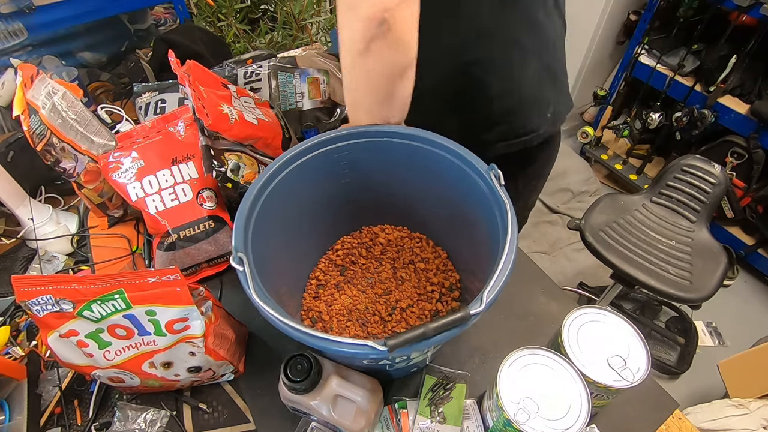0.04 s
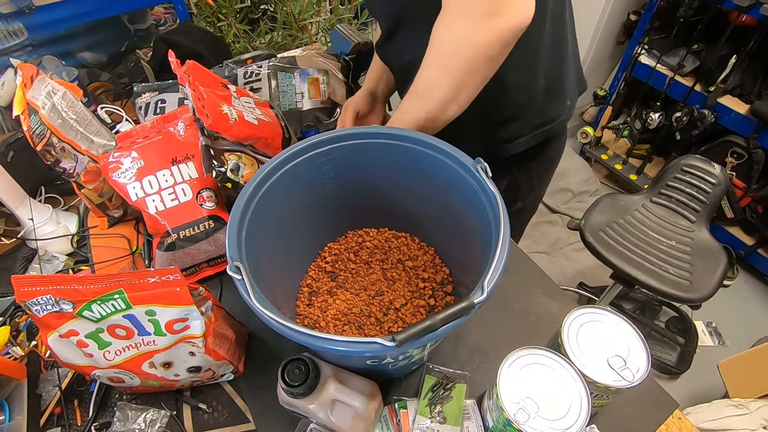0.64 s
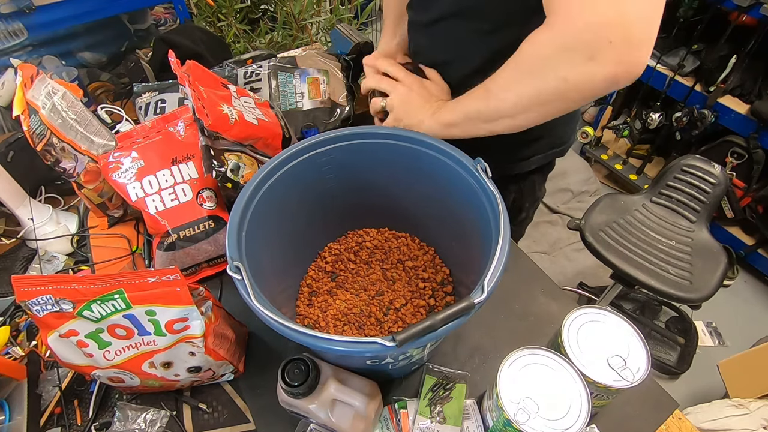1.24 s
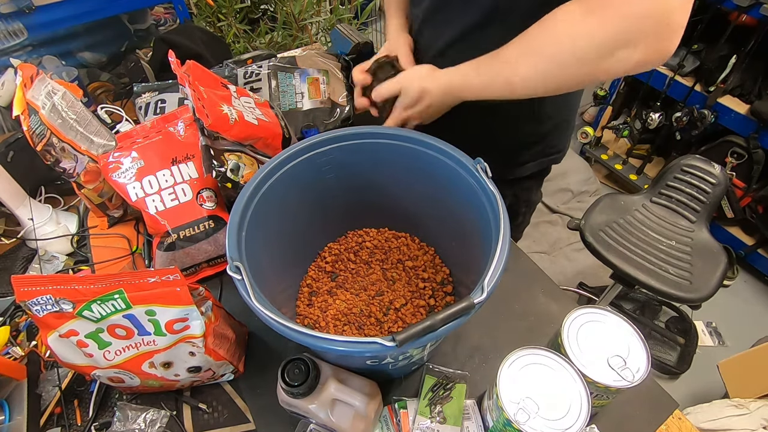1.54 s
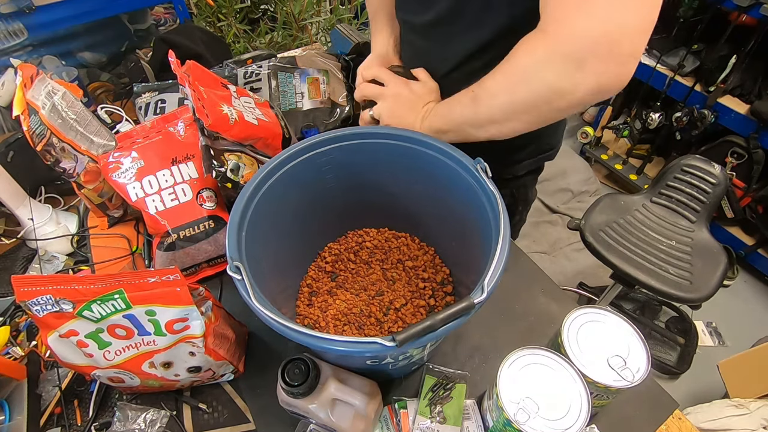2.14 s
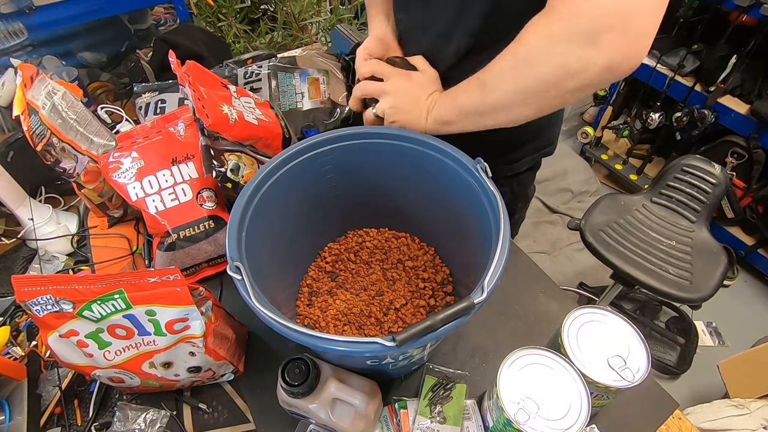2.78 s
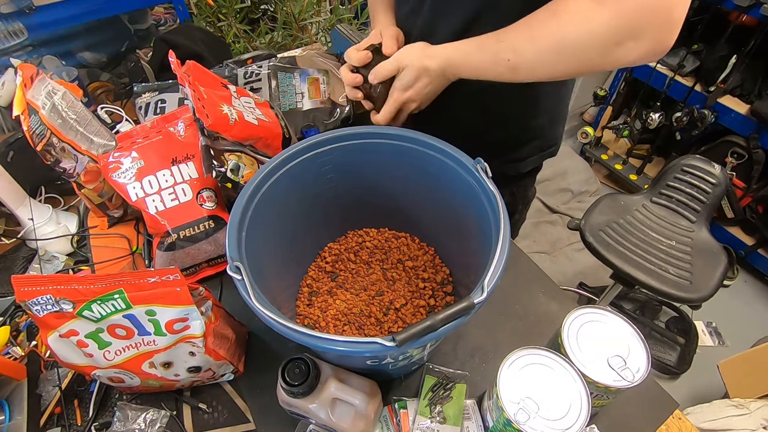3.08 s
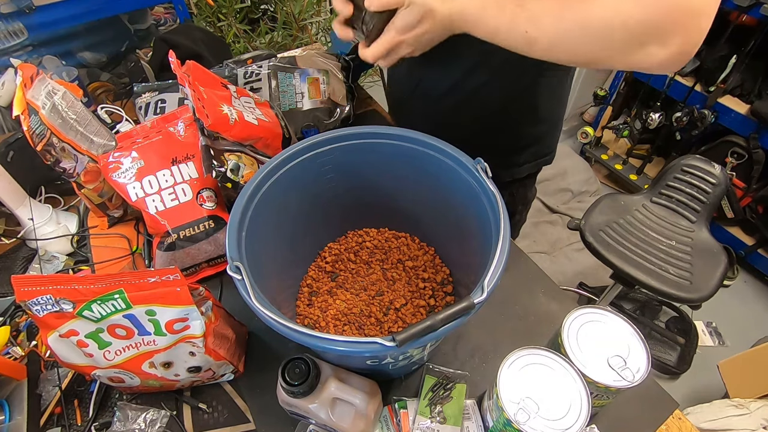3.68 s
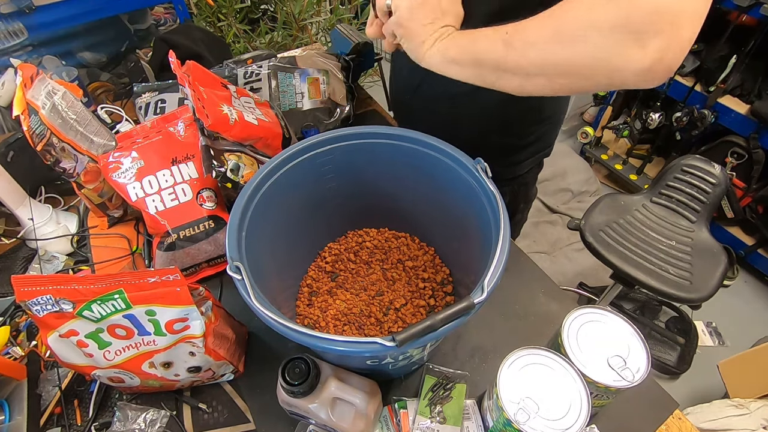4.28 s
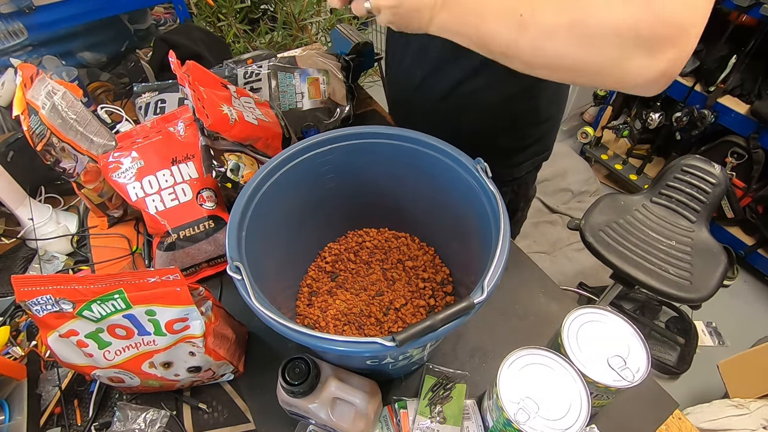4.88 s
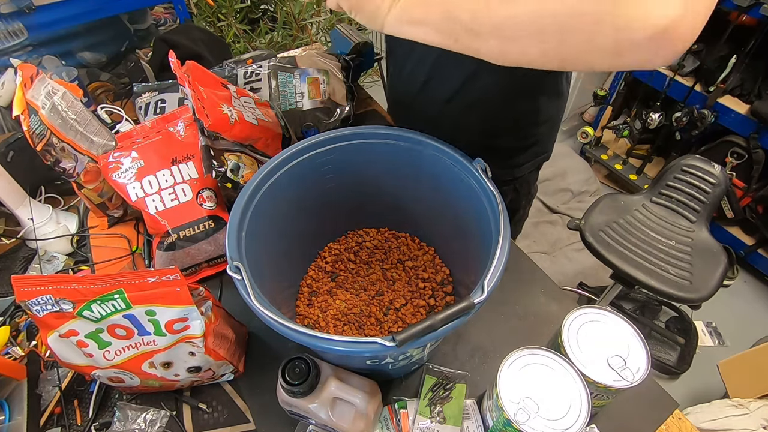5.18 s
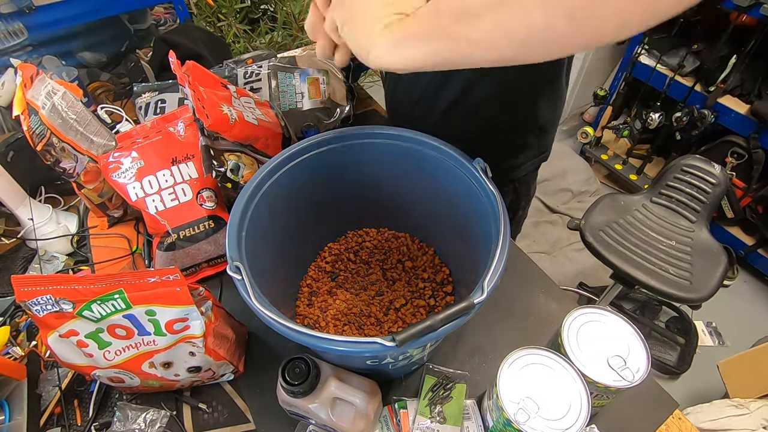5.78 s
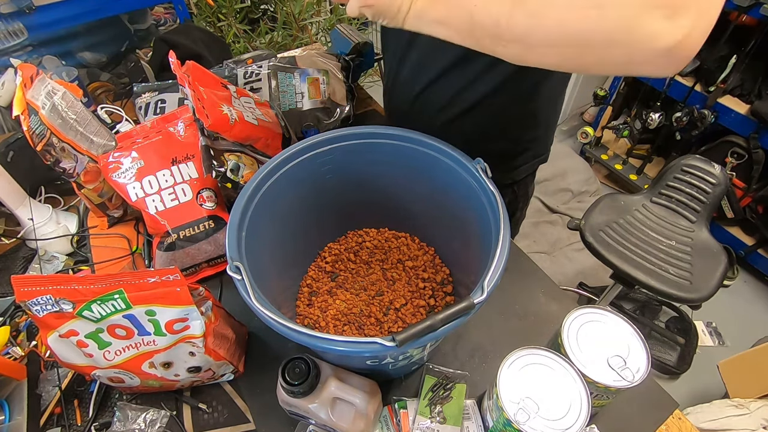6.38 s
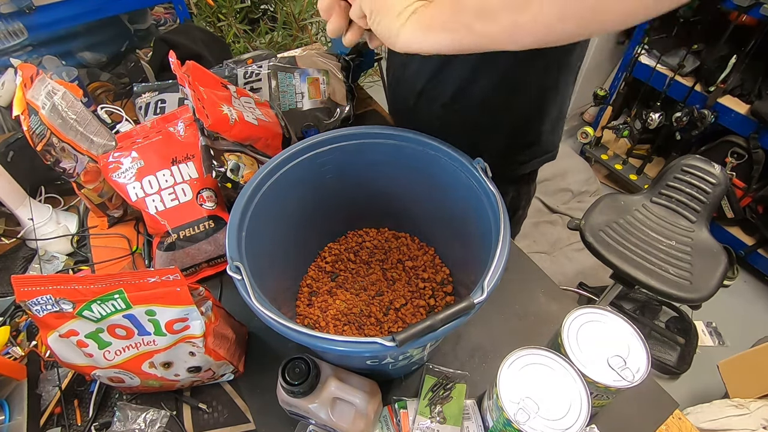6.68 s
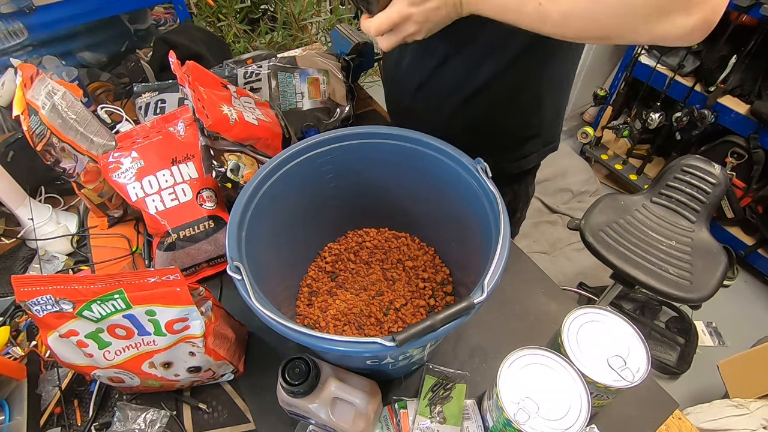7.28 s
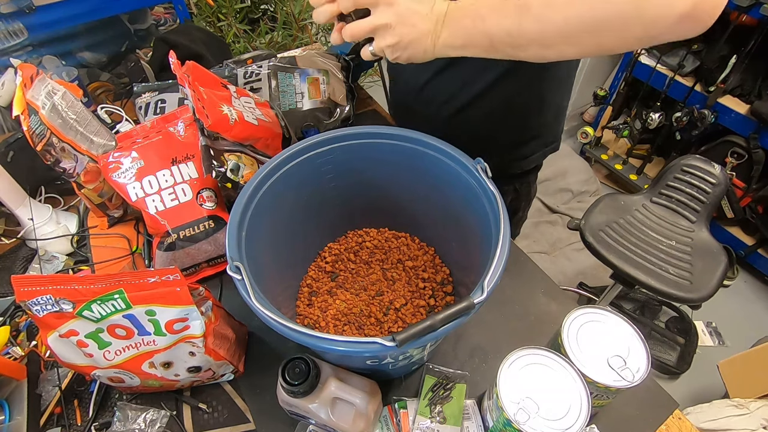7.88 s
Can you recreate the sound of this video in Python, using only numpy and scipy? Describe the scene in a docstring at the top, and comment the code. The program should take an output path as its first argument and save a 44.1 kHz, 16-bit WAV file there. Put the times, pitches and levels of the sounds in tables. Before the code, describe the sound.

A plastic hand grinder is picked up from a bench with a knock and a soft slide. After about a second it starts crushing dry pellets, twist after twist: sharp, brittle snaps come in irregular clusters over gritty grinding, with a few hollow knocks and brief plastic creaks. The crunching continues to the end. It sounds close, in a small quiet shed, with a bucket ringing faintly along.

```python
"""In a cluttered shed, dry bait pellets are crushed in a hand-twisted plastic grinder above a bucket.
The grinder is picked up from the bench and closed; at each twist the pressure builds, crumbs grind
and pellets snap between its teeth. Each brittle fracture is a burst of impulses that excites the wall
and the air of the hollow pot and jolts the hands. Now and then the halves creak or lurch.
The open plastic bucket resonates and the small room reverberates, over quiet air and a faint hum."""
import sys
import numpy as np
from scipy import signal
from scipy.fft import rfft, irfft, next_fast_len
from scipy.io import wavfile

SR = 44100
rng = np.random.default_rng(int(sys.argv[2]) if len(sys.argv) > 2 else 0)


def write(x):
    x = np.atleast_2d(x).T
    wavfile.write(sys.argv[1], SR, np.round(np.clip(x, -1, 1) * 32767).astype(np.int16))


N = 358974
SIZE = 8192  # samples in a force burst or a filter design

# spectrum of a snap heard through the plastic wall: f/Hz, level/dB
WALL_SPECTRUM = [(200, -28.5), (330, -3.5), (850, -11.5), (1230, -5.5), (1580, -7), (2130, 2.5),
                 (2620, -2.5), (3350, 1), (4500, -5.5), (5500, -6), (6400, -12), (7500, -11), (9200, -15.5),
                 (10800, -30.5), (15500, -41.5)]
# spectrum of a dull jolt of the whole grinder: f/Hz, level/dB
JOLT_SPECTRUM = [(22, -39.5), (60, -8.5), (115, -15), (155, 8), (230, 1.5), (340, 4.5), (600, -20)]
# how the hands hold the pot: t/s, cavity pitch f/Hz, cavity level/dB and jolt level/dB re the snap
GRIP = [(1.1, 580, -17, -24), (1.4, 477, -10.5, -24), (3, 442, -14.5, -20), (3.7, 548, -13, -23),
        (5, 527, -11, -25.5), (5.7, 479, -10, -24), (6.5, 467, -13, -26), (7.05, 500.6, -13.5, -24.5),
        (7.8, 462.6, -14, -26.5)]
# twists of the hands: start t/s, length/s, level/dB at full pressure
TWISTS = [(1.268, 0.36, -27), (1.728, 0.065, -35.5), (1.894, 0.11, -32.5), (2.055, 0.082, -26),
          (2.248, 0.21, -25), (2.553, 0.099, -24.5), (2.894, 0.16, -30.5), (3.109, 0.22, -34),
          (3.42, 0.21, -26), (3.704, 0.069, -33), (4.0, 0.22, -39.5), (4.39, 0.19, -25.5),
          (4.677, 0.033, -27), (4.808, 0.052, -25.5), (4.935, 0.046, -39), (5.167, 0.222, -33),
          (5.5, 0.287, -31), (5.851, 0.3, -33.5), (6.21, 0.32, -32), (6.663, 0.031, -38.5),
          (6.853, 0.1, -35), (7.306, 0.13, -33), (7.49, 0.34, -34.5)]


def pellet_breaks(piece_hz=(900, 10000), rim_hz=1220, scatter=0.33, count=5):
    """Brittle fracture: the pieces snap through the wall, excite the pot's air and jolt the grinder."""
    # loudest breaks and knocks of plastic: t/s, crumbling time/s, level/dB, tilt/(dB per octave)
    loud_breaks = [(0.243, 0.0045, -20, -1.5), (0.388, 0.0065, -38.5, -6), (0.539, 0.0052, -36.5, 5),
                   (0.834, 0.001, -44, -7), (0.932, 0.0021, -42, 3.5), (1.106, 0.0031, -25.5, -2.5),
                   (1.205, 0.0016, -34, -1.5), (1.254, 0.0019, -32, 0.5), (1.289, 0.0043, -21, -1.5),
                   (1.322, 0.0016, -27, -0.5), (1.393, 0.004, -27, -7.5), (1.444, 0.0044, -19.5, -1.5),
                   (1.535, 0.0093, -14.5, -3.5), (1.585, 0.0075, -18.5, -2.5), (1.682, 0.0021, -28, -3),
                   (1.745, 0.01, -25.5, -8.5), (1.898, 0.0078, -18, 3), (1.923, 0.0044, -19, -4),
                   (2.057, 0.00061, -23.5, -1), (2.072, 0.0051, -18, -0.5), (2.115, 0.0057, -19, 2.5),
                   (2.296, 0.0021, -22, -1), (2.344, 0.0039, -17.5, 3), (2.473, 0.0003, -24, -1),
                   (2.561, 0.011, -18, 0.5), (2.682, 0.0092, -15, 1), (2.717, 0.0012, -23, 1),
                   (2.867, 0.0026, -27, -0.5), (2.897, 0.014, -18, -1), (2.941, 0.0053, -16.5, -4),
                   (2.975, 0.0056, -20.5, 1), (3.01, 0.0034, -23, 2.5), (3.129, 0.012, -19, -2),
                   (3.168, 0.0043, -23, 3.5), (3.189, 0.0031, -19, 0.5), (3.227, 0.0049, -21, 3),
                   (3.291, 0.0012, -25.5, -2), (3.323, 0.0055, -20, -0.5), (3.447, 0.006, -26, -2),
                   (3.541, 0.0031, -20, -0.5), (3.72, 0.0039, -23, -1.5), (3.829, 0.0032, -32.5, -5),
                   (3.99, 0.0092, -27, -3.5), (4.055, 0.0012, -19.5, 5.5), (4.161, 0.0036, -22.5, 4.5),
                   (4.254, 0.0013, -31, 0), (4.389, 0.00057, -23, -2.5), (4.414, 0.00068, -40, -3.5),
                   (4.475, 0.0017, -20.5, 7.5), (4.493, 0.012, -19.5, 6), (4.548, 0.0096, -18, 6.5),
                   (4.689, 0.0055, -15.5, 0.5), (4.8, 0.0013, -23.5, 3.5), (4.842, 0.0021, -25, 6.5),
                   (4.936, 0.0067, -24, 0.5), (4.964, 0.0059, -16, 1), (5.115, 0.0012, -35.5, -4.5),
                   (5.193, 0.0099, -24.5, -2), (5.225, 0.0077, -18.5, 2), (5.251, 0.0057, -18, -1.5),
                   (5.321, 0.00019, -29, 15), (5.34, 0.0021, -20, 3.5), (5.55, 0.006, -19.5, -1.5),
                   (5.572, 0.0023, -19.5, 2.5), (5.618, 0.011, -16.5, 0), (5.67, 0.003, -22, 1),
                   (5.707, 0.0077, -19.5, 0), (5.741, 0.0074, -24.5, 7), (5.873, 0.0052, -28, -2.5),
                   (5.906, 0.0027, -20, 0), (5.932, 0.01, -15, -0.5), (6.017, 0.0057, -15.5, 1.5),
                   (6.159, 0.002, -28.5, -5.5), (6.243, 0.0018, -23.5, 6), (6.301, 0.0069, -16, 1),
                   (6.353, 0.0021, -22.5, 1.5), (6.442, 0.00095, -23, 1.5), (6.463, 0.011, -17, 0.5),
                   (6.546, 0.0024, -20, 0.5), (6.678, 0.003, -20, 0), (6.764, 0.0019, -21.5, -2),
                   (6.856, 0.00067, -19, 2.5), (6.86, 0.012, -18.5, 3.5), (7.015, 0.0062, -21, -1),
                   (7.055, 0.0029, -16.5, 1.5), (7.319, 0.00049, -20.5, 4), (7.32, 0.0077, -18, 0),
                   (7.377, 0.002, -22, 1.5), (7.433, 0.0017, -22.5, -6.5), (7.566, 0.0033, -19.5, -1),
                   (7.617, 0.0049, -16.5, 2), (7.684, 0.0053, -19.5, -3), (7.771, 0.0022, -21.5, 5.5),
                   (7.784, 0.0024, -20.5, 3)]
    # the rim's open clack, which fades as the halves close up: t/s, level/dB at its resonance
    rim_clack = [(3.1, 3.5), (5.2, -3)]
    out, jolt = np.zeros(N), response(JOLT_SPECTRUM)
    grip_s, grip_hz, grip_cavity_db, grip_jolt_db = np.transpose(GRIP)
    for start, crumble_s, db, tilt_db in loud_breaks + small_breaks():
        pitches = np.geomspace(*piece_hz, count) * np.exp(scatter * rng.uniform(-1.22, 1, count))
        # small, high pieces are more numerous than large ones
        pieces = [unit(force_burst(crumble_s, np.sqrt(hz / piece_hz[0]))) for hz in pitches]
        force = sum(pieces)
        snap = sum(through(piece, chip_ring(hz)) for piece, hz in zip(pieces, pitches))
        rim_gain = undb(np.interp(start, *np.transpose(rim_clack)))
        snap += (rim_gain - 1) * resonance(snap, rim_hz, q=3.3)
        cavity = pot_air(np.interp(start, grip_s, grip_hz))
        # weaker breaks sound hollower
        cavity_db = np.interp(start, grip_s, grip_cavity_db) + 0.18 * (-13.5 - db)
        sound = unit(through(snap, response(WALL_SPECTRUM, tilt_db)))
        sound += undb(cavity_db) * unit(through(force, cavity))
        sound += undb(np.interp(start, grip_s, grip_jolt_db)) * unit(through(force, jolt))
        add(out, start, undb(db) * sound)
    return out


def small_breaks(crumble_s=0.0013, above_db=2, spread_db=3, tilt_db=-1, count=60):
    """Fracture under load: rows of lesser breaks at random times, as strong as the hands press."""
    timing, strength, sizes = rng.random((count, 3)).T
    starts = (np.arange(count) + timing) / count * (N - 1)
    load_db = 20 * np.log10(pressure(TWISTS)[starts.astype(int)] + 1e-9)
    levels = load_db + above_db + spread_db * (2 * strength - 1)
    return [(start / SR, crumble_s * (.5 + size), db, tilt_db)
            for start, size, db in zip(starts, sizes, levels) if db > -50]


def force_burst(scale_s, density=1, rate=1200, spread_db=1.0, limit=64):
    """Impulsive excitation: a run of tiny, uneven impulses that swells and thins out."""
    delay_s = rng.gamma(2, 1, limit) * scale_s
    force = rng.choice([-1, 1], limit) * undb(spread_db * np.minimum(rng.exponential(1, limit), 4))
    active = np.arange(limit) < density * (3 + rate * scale_s)
    return np.bincount(np.minimum(delay_s * SR, SIZE - 1).astype(int), force * active, SIZE)


def chip_ring(hz, q=1.64, decay_s=0.00086, click=0.49, size=256):
    """Free vibration of one piece: a cluster of heavily damped modes around its pitch."""
    ring = unit(rng.standard_normal(size) * np.exp(-np.arange(size) / SR / decay_s))
    ring[0] += click
    return resonance(ring, hz, q)


def pot_air(hz):
    """Cavity resonance: the impulse response of the air in the pot at a given pitch."""
    # spectrum of the pot between cupped hands: multiple of its pitch, level/dB
    cavity_spectrum = [(.25, -42.5), (.56, -15.5), (0.801, -5), (1.019, -1), (1.2, -3.5), (1.5, -17),
                       (3, -64.5)]
    return response([(hz * multiple, db) for multiple, db in cavity_spectrum])


def hollow_knocks(push_s=0.004, q=1.8):
    """Impact excitation of a cavity: a soft blow sets the air in the pot ringing."""
    # knocks of the grinder in the cupped hands: t/s, level/dB
    knocks = [(0.244, -25), (0.388, -41.5), (1.746, -29), (4.159, -23), (4.555, -23), (4.689, -24),
              (4.962, -24.5), (5.619, -21), (7.02, -23), (7.322, -24.5)]
    out = np.zeros(N)
    grip_s, grip_hz, *_ = np.transpose(GRIP)
    for start, db in knocks:
        hz = np.interp(start, grip_s, grip_hz)
        blow = through(force_burst(push_s), pot_air(hz))
        add(out, start, undb(db) * unit(resonance(blow, hz, q)))
    return out


def lurches(slip_s=0.00299):
    """Sudden release of load: the teeth give way and the halves slip round with a jolt and a thud."""
    # slips of the halves: t/s, jolt level/dB, thud level/dB
    slips = [(0.247, -26.5, -36), (1.923, -31, -68), (2.115, -39, -63), (4.571, -31.5, -42),
             (4.699, -40, -52), (4.98, -40, -50), (6.02, -41, -38), (6.86, -41, -49), (7.32, -41.5, -46),
             (7.632, -50, -46.5), (7.783, -45, -52)]
    # spectrum of the deep thud: f/Hz, level/dB
    thud_spectrum = [(22, -11), (55, 8), (90, 8), (130, 6), (250, -42)]
    out, jolt, thud = np.zeros(N), response(JOLT_SPECTRUM), response(thud_spectrum)
    for start, jolt_db, thud_db in slips:
        force = force_burst(slip_s)
        add(out, start, undb(jolt_db) * unit(through(force, jolt)))
        add(out, start, undb(thud_db) * unit(through(force, thud)))
    return out


def creaks(slip_s=0.0048, q=7):
    """Stick-slip friction: a short run of slips keeps one mode of the wall ringing."""
    # the plastic halves bind: t/s, f/Hz, level/dB
    binds = [(1.365, 2400, -41), (5.742, 2034, -19), (6.515, 2130, -19)]
    out = np.zeros(N)
    for start, hz, db in binds:
        mode = resonance(force_burst(slip_s), hz, q)
        add(out, start, undb(db) * unit(resonance(mode, hz, q)))
    return out


def grinding(wall_db=-0.5, cavity_db=-10, jolt_db=-24):
    """Granular friction: crumbs scrape round the pot, and their ticks drive its wall, air and body."""
    mean_hz = np.mean(GRIP, axis=0)[1]
    pot = undb(wall_db) * unit(response(WALL_SPECTRUM, tilt_db=-1.5))
    pot += undb(cavity_db) * unit(pot_air(mean_hz))
    pot += undb(jolt_db) * unit(response(JOLT_SPECTRUM))
    return through(ticks(rate=2500, spread_db=3.0) * pressure(TWISTS), pot)


def sliding(low_cut_hz=260):
    """Sliding friction: plastic catches and slips in fine, dull ticks."""
    # the grinder slides on the bench and its halves slide together: t/s, length/s, peak level/dB
    slides = [(0.02, 0.092, -50), (0.132, 0.055, -36.5), (0.77, 0.37, -42), (3.87, 0.16, -43),
              (8.04, 0.063, -51)]
    # spectrum of sliding plastic: f/Hz, level/dB
    slide_spectrum = [(150, -45), (250, -10.5), (569, -2.5), (1270, -10.5), (1460, -3.5), (3380, -5),
                      (5550, -19.5), (9130, -26.5), (15000, -60)]
    low_cut = signal.butter(2, low_cut_hz, "high", fs=SR, output="sos")
    plastic = unit(signal.sosfilt(low_cut, response(slide_spectrum)))
    return through(ticks(rate=3000, spread_db=2.7) * pressure(slides), plastic)


def pressure(strokes, grab_share=0.23, build_db_per_s=33, release_s=0.0087):
    """Friction noise grows with load: its gain as each stroke takes hold, builds up and lets go."""
    out = np.zeros(N)
    for start, length, db in strokes:
        first = int(start * SR)
        age = np.arange(min(SR // 2, N - first)) / SR
        grab = np.minimum(age / (grab_share * length), 1)
        build = undb(db - build_db_per_s * np.maximum(length - age, 0))
        release = np.exp(-np.maximum(age - length, 0) / release_s)
        out[first:first + len(age)] += grab * build * release
    return out


def ticks(rate, spread_db):
    """Shot noise of unit RMS: random contacts of uneven force, at a mean rate per second."""
    contacts = (rng.random(N) < rate / SR) * rng.choice([-1, 1], N)
    force = undb(spread_db * np.minimum(rng.exponential(1, N), 5))
    return np.sqrt(N) * unit(contacts * force)


def bench_bumps(push_s=0.01):
    """Soft impact: a slow push draws a low knock from the bench."""
    # the body shifts at the bench: t/s, level/dB
    bumps = [(0.017, -44.5), (0.164, -41), (0.459, -54), (0.523, -51.5), (0.589, -52), (0.766, -52.5),
             (0.809, -53)]
    # spectrum of a bump: f/Hz, level/dB
    bench_spectrum = [(50, -26), (120, -11.5), (175, 7.5), (230, -10), (330, -15), (900, -52)]
    out, bench = np.zeros(N), response(bench_spectrum)
    for start, db in bumps:
        add(out, start, undb(db) * unit(through(force_burst(push_s), bench)))
    return out


def bucket_ring(dry):
    """Sympathetic resonance: damped modes of the open bucket and the shed ring along."""
    # modes: f/Hz, level/dB at resonance, T60/s
    modes = [(179.3, -3.5, 0.59), (236.4, 12.5, 0.18), (502, 1, 0.37), (516, 6.5, .35), (1218, -16, 0.16),
             (2180, 3.5, 0.49)]
    t, ring = np.arange(SR // 2) / SR, 0
    for hz, db, t60 in modes:
        damping = np.log(1000) / t60
        ring += undb(db) * 2 * damping / SR * np.exp(-damping * t) * np.cos(2 * np.pi * hz * t)
    return through(dry, ring)


def moving_echoes(dry, step_s=.3, places=6):
    """Echoes depend on source position: as the hands move, patterns cross-fade at constant power."""
    position = np.arange(N) / SR / step_s
    distances = [np.abs((position - k) % places - places / 2) for k in range(places)]
    return sum(shed_echoes(dry * np.cos(np.pi / 2 * np.minimum(d, 1))) for d in distances)


def shed_echoes(dry, room_db=-3, near_s=0.0012, near_db=1.0):
    """Reflection from one position: a diffuse tail in the middle, early echoes and tail at the sides."""
    # side-signal spectrum of the near reflections: f/Hz, level/dB
    near_width = [(60, -8), (150, -11.5), (450, -13), (750, -26), (1300, -7), (2400, -7), (4400, -10.5),
                  (8000, 0.5), (15000, -2)]
    # side-signal spectrum of the tail: f/Hz, level/dB
    tail_width = [(60, -1), (250, -17.5), (500, -8), (1100, 1), (3000, -6), (15000, 4.5)]
    tail = undb(room_db) * room_tail()
    t = np.arange(len(tail)) / SR
    near = unit(rng.standard_normal(len(t)) * t * np.exp(-t / near_s))
    lateral = undb(near_db) * through(near, response(near_width))
    lateral += undb(room_db) * through(room_tail(), response(tail_width))
    mid, side = through(dry, tail), through(dry, lateral)
    return np.array([mid + side, mid - side])


def room_tail(t60_low=0.31, t60_mid=0.32, t60_high=0.4, low_db=-3, build_s=0.0092, bend=1.054):
    """Reverberation: diffuse echoes build up among the clutter and die away band by band."""
    t = np.arange(SR * 3 // 5) / SR
    noise = rng.standard_normal(len(t))
    low = signal.sosfilt(signal.butter(2, 350, fs=SR, output="sos"), noise)
    below_treble = signal.sosfilt(signal.butter(2, 6000, fs=SR, output="sos"), noise)
    bands = [(undb(low_db) * low, t60_low), (below_treble - low, t60_mid),
             (noise - below_treble, t60_high)]
    tail = sum(band * np.exp(-np.log(1000) * (t / t60) ** bend) for band, t60 in bands)
    return unit(tail * np.sqrt(1 - np.exp(-t / build_s)))


def to_the_left(sound):
    """Interaural level difference: most bands are a little louder at the left ear."""
    # left ear re right ear: f/Hz, level/dB
    left_lead = [(60, 4), (110, -0.5), (200, 0.5), (380, 0.5), (700, 0.5), (1290, 1.5), (2380, 2),
                 (4400, 1.0), (8120, 0.0), (15000, 4)]
    hz, db = np.transpose(left_lead)
    size = next_fast_len(N)
    bin_hz = np.arange(size // 2 + 1) * SR / size
    lead_db = np.interp(np.log(bin_hz + 1), np.log(hz), db)
    ear_gains = undb(np.array([lead_db, -lead_db]) / 2)
    return irfft(rfft(sound, size) * ear_gains, size)[:, :N]


def background(air_db=-60.5, side_db=-7, hum_hz=86):
    """Ambient noise: the quiet air of the shed and a faint low hum that comes and goes."""
    # spectrum of the still air: f/Hz, relative level/dB
    air_spectrum = [(25, -7), (110, -33), (165, 5.5), (300, -16.5), (550, -4), (1000, -9), (3000, -7),
                    (8000, -23), (15000, -42)]
    # envelope of the hum: t/s, level/dB
    hum_levels = [(0, -78), (2, -104), (2.4, -67), (3.1, -84), (3.7, -71), (4.4, -64), (5.2, -74),
                  (8.1, -85)]
    t, air = np.arange(N) / SR, response(air_spectrum)
    mid, side = (np.sqrt(N) * unit(through(rng.standard_normal(N), air)) for _ in range(2))
    hum_rms = undb(np.interp(t, *np.transpose(hum_levels)))
    hum = np.sqrt(2) * hum_rms * np.sin(2 * np.pi * hum_hz * t)
    return undb(air_db) * (mid + undb(side_db) * np.array([side, -side])) + hum


def response(spectrum, tilt_db=0):
    """Minimum-phase impulse response of a spectrum (f/Hz, level/dB), tilted per octave about 3 kHz."""
    hz, db = np.transpose(spectrum)
    octave = np.log2(np.maximum(np.arange(SIZE // 2 + 1), 1) * SR / SIZE)
    tilt = tilt_db * np.clip(octave - np.log2(3000), -1.5, 1.5)
    roll_off = -20 * np.maximum(octave - np.log2(hz[-1]), 0)
    gain = undb(np.interp(octave, np.log2(hz), db) + tilt + roll_off)
    cepstrum = irfft(np.log(gain))
    cepstrum[1:SIZE // 2] *= 2  # folding onto positive time makes the response causal
    cepstrum[SIZE // 2 + 1:] = 0
    return irfft(np.exp(rfft(cepstrum)))[:SIZE // 2]


def resonance(x, hz, q):
    """A second-order resonator with unit gain at its pitch."""
    return signal.lfilter(*signal.iirpeak(min(hz, SR / 3), q, fs=SR), x)


def through(x, ring):
    """Convolution with an impulse response, cut to the input's length."""
    return signal.oaconvolve(x.astype(np.float32), ring.astype(np.float32))[:len(x)]


def add(out, start, sound):
    """Superposition: mix a sound in, scaled so that unit energy equals unit power over 10 ms."""
    i = int(start * SR)
    part = sound[:max(N - i, 0)]
    out[i:i + len(part)] += part * np.sqrt(SR / 100)


def unit(x):
    """Normalisation to unit energy."""
    return x / np.sqrt(np.sum(x ** 2) + 1e-18)


def undb(db):
    """Decibels to amplitude ratio."""
    return 10 ** (np.asarray(db) / 20)


def scene():
    """Direct sound, resonance and echoes add; the grinder is a little to the left, over the bucket."""
    direct = pellet_breaks() + hollow_knocks() + lurches() + creaks()
    direct += grinding() + sliding() + bench_bumps()
    return to_the_left(direct + bucket_ring(direct) + moving_echoes(direct)) + background()


def record(dry):
    """Band limiting: a steep low-pass removes the treble above 15 kHz."""
    return signal.sosfilt(signal.ellip(8, .2, 70, 15000, fs=SR, output="sos"), dry)


dry = scene()
out = record(dry)
write(out)
```